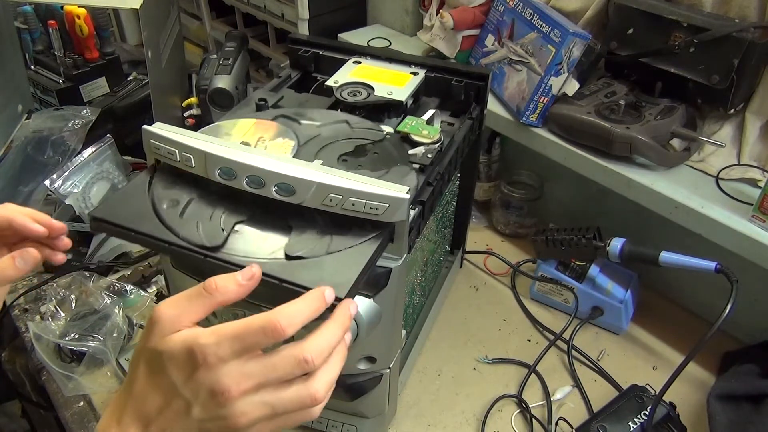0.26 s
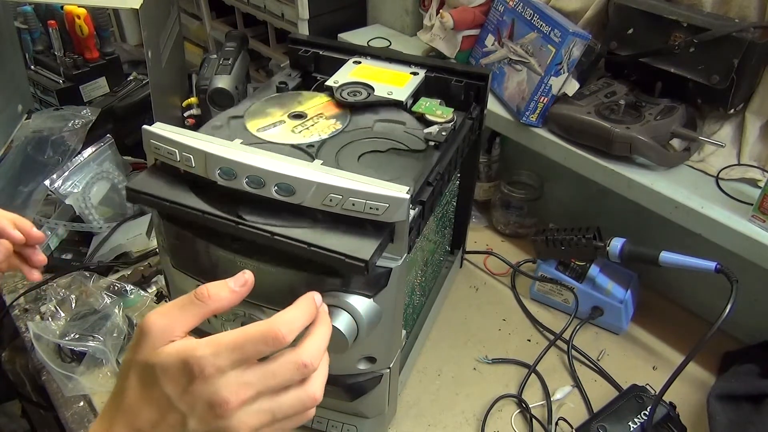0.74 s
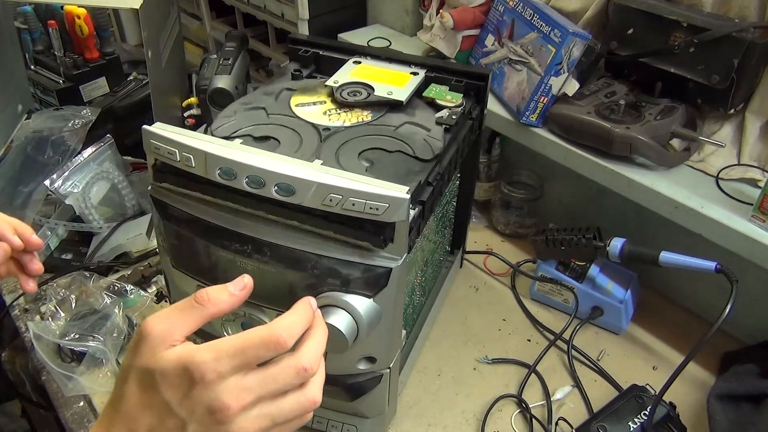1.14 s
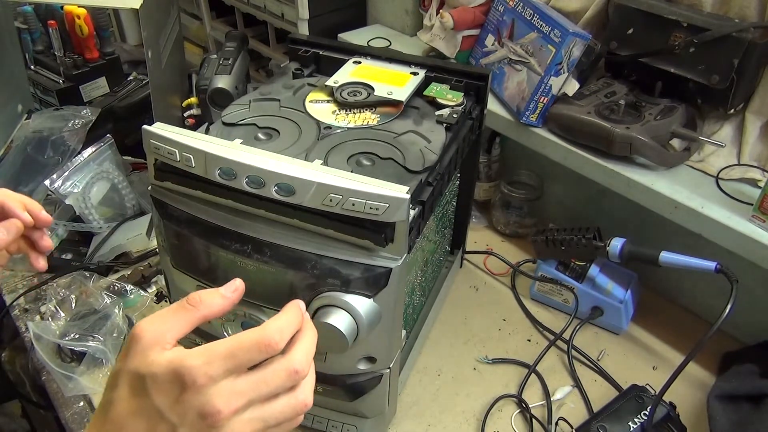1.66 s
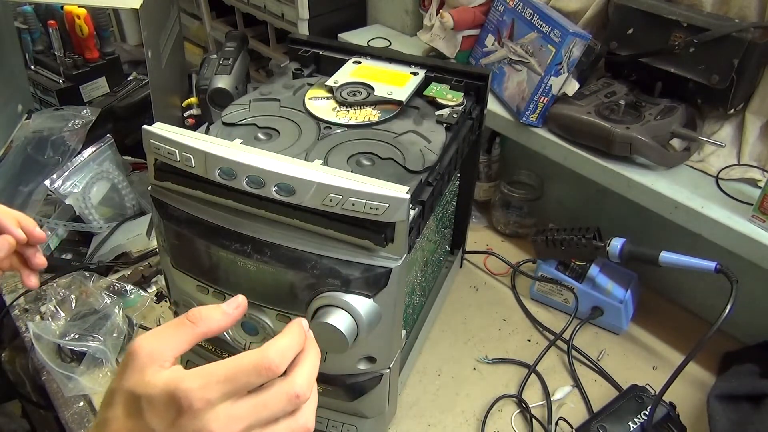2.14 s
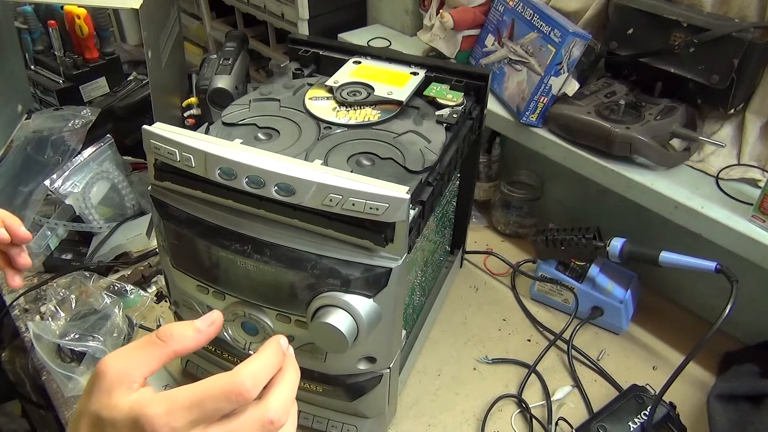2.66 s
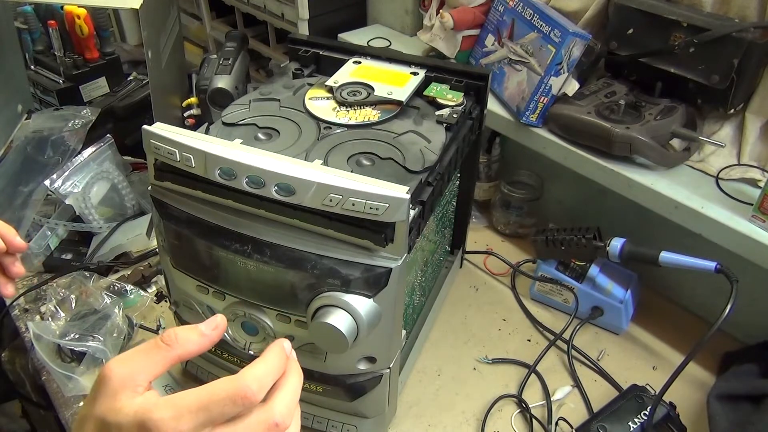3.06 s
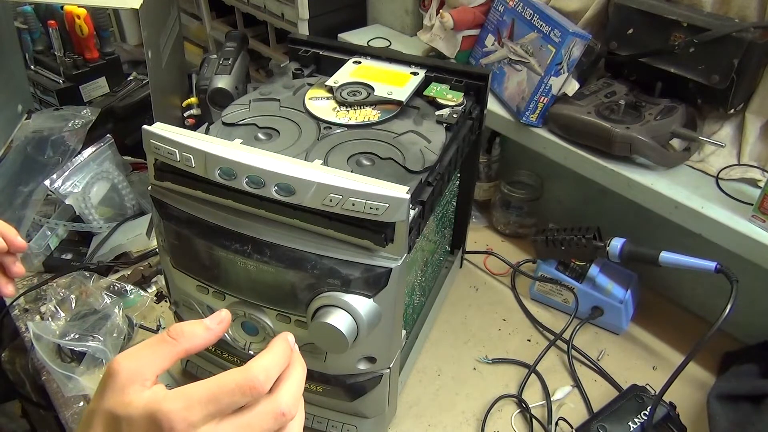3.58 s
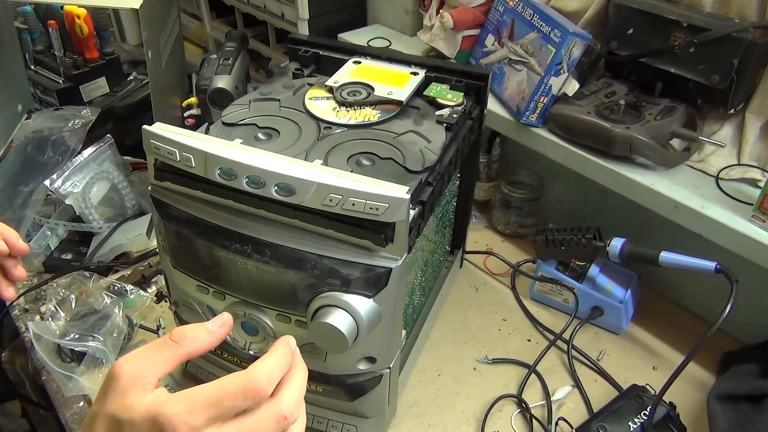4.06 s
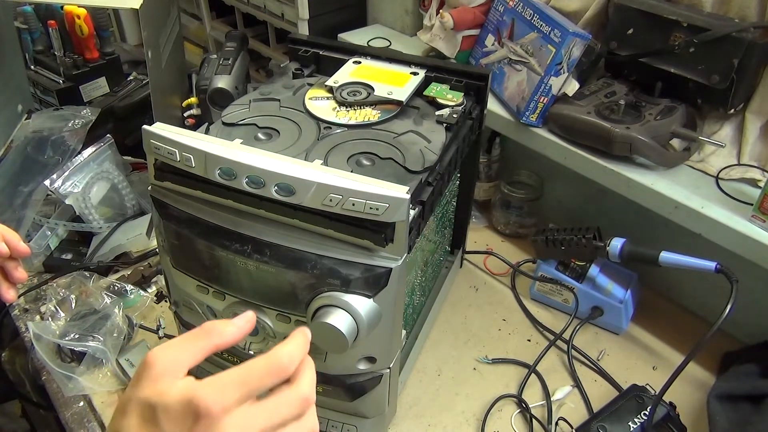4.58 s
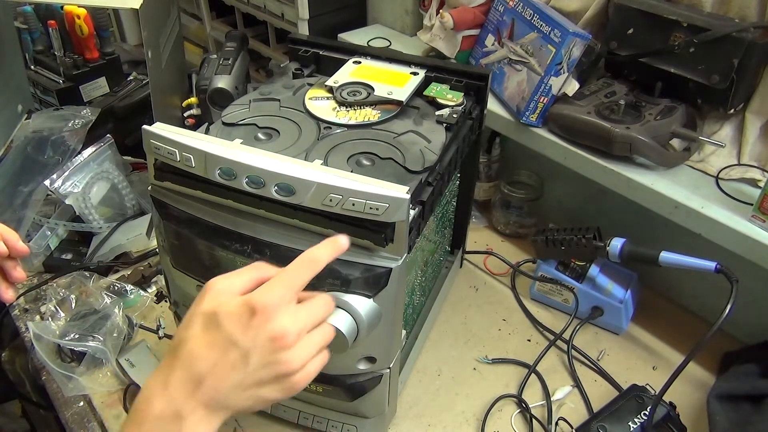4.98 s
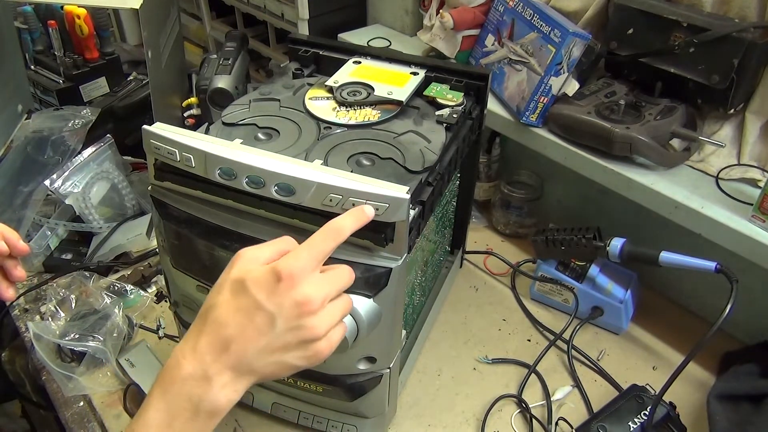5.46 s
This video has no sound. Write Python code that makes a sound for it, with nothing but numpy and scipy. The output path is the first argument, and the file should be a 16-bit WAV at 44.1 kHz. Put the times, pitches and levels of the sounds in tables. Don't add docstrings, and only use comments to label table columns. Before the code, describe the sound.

A plastic disc tray clicks, whirs in on a geared motor, clacks and rattles shut, then a low mains hum swells.

```python
import sys
import numpy as np
from scipy import signal
from scipy.fft import rfft, irfft, next_fast_len
from scipy.io import wavfile
from scipy.ndimage import map_coordinates

SR = 44100
rng = np.random.default_rng(int(sys.argv[2]) if len(sys.argv) > 2 else 0)


def pcm_store(signal):
    levels = np.round(np.clip(np.atleast_2d(signal), -1, 1) * 32767)
    wavfile.write(sys.argv[1], SR, levels.astype(np.int16).T)


def gain_from_db(level_db):
    decades = np.asarray(level_db, float) / 20
    return 10 ** decades


N = 252693
T = np.arange(N) / SR

# time in seconds, level in dB.
PULL_LOAD = [(.1, -63), (.152, -30), (.228, -27), (.296, -34), (.87, -33), (1.148, -30), (1.446, -32),
             (1.57, -30.5), (1.72, -31)]
# time in seconds, level in dB.
LIFT_LOAD = [
    (1.721, -28.5),
    (1.755, -44),
    (2.023, -33.5),
    (2.12, -33.5),
]
# time in seconds, level in dB.
TURN_LOAD = [(2.12, -42.5), (2.275, -39), (2.375, -43), (2.555, -35.5), (2.615, -40.5), (2.655, -36.5),
             (2.737, -42), (2.775, -55), (2.85, -66)]
# case, gears and brushes, all in dB over the load.
LOAD_SHARES = [
    (1.13, 0.6, -9.5),
    (1, -11, -10),
    (1.5, -2, -13),
]
# start in seconds, end in seconds, whine level in dB.
ROTOR_SPINS = [
    (.25, 1.61, -47),
    (2.16, 2.686, -50.5),
]
# time in seconds, level in dB.
CHASSIS_COUPLING = [(.15, -60), (.25, -57), (.9, -62), (1.15, -40.5), (1.6, -32.5), (1.66, -44),
                    (2.14, -39.5), (2.35, -45), (2.74, -41)]
# frequency in Hz, width in Hz, level in dB.
CASE_MODES = [(72, 6.4, 5.5), (238.4, 21, 4), (300, 30, -2.5), (384, 44, 1), (510, 48, 2), (608, 88, -4),
              (738.6, 34, 1.5), (907, 45, -0.5), (1050, 41, 0.5)]
# frequency in Hz, width in Hz, level in dB.
GEAR_MODES = [(1197, 360, -0.5), (1600, 380, 1), (1900, 340, 1), (2460, 300, -1), (2760, 510, -3),
              (3670, 1100, -10.5)]
# frequency in Hz, level in dB per Hz.
BRUSH_SPECTRUM = [(2060, -34.5), (3500, -5.5), (4740, -0.5), (5990, -3.5), (7560, -5.5), (9190, -17),
                  (13200, -20), (15800, -23.5)]
# frequency in Hz, width in Hz, level in dB.
WHINE_MODES = [(7340, 260, 1), (9550, 300, -15), (10300, 330, -16)]


def motor():
    loads = np.array([curves(stage)[0] for stage in (PULL_LOAD, LIFT_LOAD, TURN_LOAD)])
    case, gears, brushes = gain_from_db(np.transpose(LOAD_SHARES)) @ loads
    case = case + gain_from_db(-43.5) * (T < PULL_LOAD[1][0])
    released, engaged = PULL_LOAD[-1][0], LIFT_LOAD[-1][0]
    coasting = held(released, released, db=-38.5, rise=0, fall=50)
    gears = gears + coasting * (T > released) * (T < engaged)
    whine = sum(held(a, b, db, rise=250, fall=220) for a, b, db in ROTOR_SPINS)
    drone = curves(CHASSIS_COUPLING)[0]

    def case_tone(f):
        return resonant(CASE_MODES)(f) * damped(f, 1460)

    def gear_tone(f):
        return resonant(GEAR_MODES)(f) * damped(f, 5500)

    def brush_tone(f):
        return gain_from_db(along(BRUSH_SPECTRUM, f))

    def whine_tone(f):
        return resonant(WHINE_MODES)(f) * (1 - damped(f, 7400))

    def drone_tone(f):
        return resonant([(735, 60, 0)])(f) ** 2

    out = gain_from_db(1.5) * case * spread(case_tone, [(500, 0.94)], 2.2, flutter_db=-1.0)
    out += gain_from_db(1.0) * gears * spread(gear_tone, [(1200, 0.93), (3000, 0.39)], 6.9, flutter_db=1.53)
    out += gain_from_db(3.5) * brushes * spread(brush_tone, [(6000, 0.24)], 5.9, flutter_db=0.4)
    out += whine * sagging(spread(whine_tone, [(7500, 1.0)], 1.4))
    return out + drone * spread(drone_tone, [(735, 0.99)], 2.0)


def sagging(whine):
    free_hz, sag_hz_per_s = 258, 220
    shift_hz = free_hz - sag_hz_per_s * (T - ROTOR_SPINS[0][0])
    shift_hz = shift_hz * (T < LIFT_LOAD[1][0])
    turning = np.exp(2j * np.pi * np.cumsum(shift_hz) / SR)
    return (signal.hilbert(whine, next_fast_len(N))[:, :N] * turning).real


# start in seconds, click level in dB, knock level in dB.
RACK_SKIPS = [
    (0.7541, -12, -14.5),
    (0.7815, -12, -10.5),
    (0.8097, -12, -9),
    (0.8352, -20, -17.5),
]
# start in seconds, peak in dB, ring in Hz, crack in dB, decay (t60) in seconds.
LATCH_CLICKS = [(0.1521, -10.5, 2350, -22, 0.035), (0.163, -18, 1540, -9, .066),
                (0.198, -11.5, 1820, -11, 0.046), (0.2112, -10, 1820, -4, 0.029),
                (0.2455, -28, 2296, -15, .066), (0.7168, -17, 1530, -3, 0.061),
                (1.503, -17.5, 1600, -34, .054), (2.0107, -12, 1790, -10, 0.062),
                (2.0475, -1.5, 2800, -16.5, 0.032), (2.088, -21, 1600, -11, 0.058),
                (2.139, -22, 3030, -11, 0.051), (2.2444, -30, 1600, -2, 0.11),
                (2.2921, -20.5, 2200, -25, 0.038), (2.465, -23, 3000, -13, 0.072),
                (2.488, -36, 1860, -26, .043), (2.5442, -13.5, 1900, -15.5, 0.047),
                (2.5606, -17.5, 1900, -17.5, .035), (2.6465, -20, 2460, -23, 0.052),
                (2.667, -17.5, 2200, -21, 0.029), (2.723, -22, 2070, -19, 0.035),
                (2.7706, -24.5, 2300, -9, 0.049)]
# start in seconds, peak in dB, ring in Hz, crack in dB, snap in dB.
SPRUNG_CATCHES = [
    (0.0844, -23, 2130, -2, -11),
    (1.481, -12, 1630, -7.5, -23),
    (1.9546, -12, 2280, -5, -7.5),
    (2.0718, -9.5, 2520, -9.5, -24),
    (2.425, -34, 1480, -13, -22),
    (2.4495, -22.5, 1820, -15, -21),
]
# frequency in Hz, level in dB.
PLASTIC_SPECTRUM = [(500, -20), (900, -1.5), (1400, -2.5), (2500, -0.5), (4000, -7.5), (5500, -18.5),
                    (8000, -57)]
# frequency in Hz, level in dB.
CRACK_SPECTRUM = [(3200, -20), (4500, 0.5), (6000, 3.5), (8000, -3.5), (9500, -16.5), (11000, -47)]
# frequency in Hz, level in dB.
SNAP_SPECTRUM = [(7500, -30), (9500, 2), (12000, -5), (16000, -11)]


def latches():
    plastic_snap_db = -33.5
    rows = [(*row[:-1], plastic_snap_db, row[-1]) for row in LATCH_CLICKS]
    rows += [(*row, 0.058) for row in SPRUNG_CATCHES]
    rows += [(s, db, 1820, -17.5, plastic_snap_db, 0.036) for s, db, _ in RACK_SKIPS]
    out, t = np.zeros((2, N)), np.arange(SR // 6) / SR
    for s, db, hz, crack_db, snap_db, t60 in sorted(rows):
        def body_tone(f):
            return gain_from_db(along(PLASTIC_SPECTRUM, f)) + resonant([(hz, .15 * hz, 1.5)])(f) * damped(f, 1.7 * hz)

        body = burst(body_tone, t, 0.88) * sides(7.1)
        crack = gain_from_db(crack_db + 3.5) * burst(lambda f: gain_from_db(along(CRACK_SPECTRUM, f)), t, 0.8) * sides(5.2)
        crack += gain_from_db(snap_db + 3.0) * burst(lambda f: gain_from_db(along(SNAP_SPECTRUM, f)), t, .3) * sides(1.6)
        hit = body * gain_from_db(-60 * t / t60) + crack * gain_from_db(-60 * t / (0.58 * t60))
        onset = 1 - np.exp(-t / 0.00045)
        add_at(out, s, room(gain_from_db(db - 1.5) * hit * onset, wet_db=-3.5))
    return out


# start in seconds, peak in dB, ring in Hz, swell in seconds.
TOOTH_RUBS = [(0.1387, -34, 2150, 0.0096), (0.6537, -24, 1740, 0.019), (1.0051, -18, 1960, 0.011),
              (1.0598, -16, 1910, 0.0083), (1.1058, -22, 1320, 0.014), (1.1689, -11, 1900, 0.0079),
              (1.1992, -21, 1970, 0.021), (1.2493, -16, 2000, 0.0062), (1.3254, -14.5, 1800, 0.013),
              (1.6893, -22, 1860, 0.006), (2.674, -18.5, 1600, 0.0088), (2.985, -38, 1300, 0.0072),
              (3.0044, -42.5, 1690, 0.01), (3.0914, -58, 1440, 0.011)]


def rubs():
    out, t = np.zeros((2, N)), np.arange(SR // 6) / SR
    for s, db, hz, swell in TOOTH_RUBS:
        grind = burst(lambda f: resonant([(hz, 500, 0)])(f) ** 2, t, 0.77)
        shape = (t / swell) * np.exp(1 - t / swell)
        add_at(out, s, gain_from_db(db - 10.5) * sides(4.8) * grind * shape)
    return out


# start in seconds, peak in dB, ring in Hz, thud in dB.
TRAY_KNOCKS = [(0.126, -21, 970, -28), (0.153, -17, 535, -17), (0.164, -20, 894, -15),
               (0.174, -17.5, 660, -12), (0.195, -14.5, 420, -27), (0.236, -21, 506, -22),
               (0.341, -24, 893, -20), (0.727, -17, 1010, -9), (0.869, -30, 1050, 0),
               (1.023, -19, 970, -14), (1.178, -21, 935, -5), (1.249, -17, 1000, -14),
               (1.482, -14.5, 732, -15), (1.51, -14, 953, -15), (1.529, -22, 956, -16),
               (1.715, -27, 704, -12)]
# start in seconds, peak in dB, ring in Hz, thud in dB.
CLAMP_KNOCKS = [
    (1.959, -20.5, 670, -19),
    (1.986, -21, 1280, -25),
    (2.004, -18.5, 725, -12),
    (2.052, -21, 1110, -5),
    (2.074, -16, 1300, -7),
    (2.099, -26, 763, -5),
]
# start in seconds, peak in dB, thud in dB.
PLATTER_KNOCKS = [(2.292, -22, -2.5), (2.42, -23, -5), (2.447, -23, -20), (2.463, -8, -16),
                  (2.486, -12.5, -6.5), (2.5458, -3, -18), (2.564, -14.5, -22), (2.584, -17.5, -7),
                  (2.674, -21.5, -6), (2.689, -31, -5)]


def knocks():
    rows = [(*row, 0.058, 3.2) for row in TRAY_KNOCKS]
    rows += [(*row, 0.11, -.3) for row in CLAMP_KNOCKS]
    rows += [(s + .0085, db, 1068, -13.5, 0.045, 5) for s, _, db in RACK_SKIPS]
    rows += [(s, db, 682, thud_db, 0.048, 3.3) for s, db, thud_db in PLATTER_KNOCKS]
    out, t = np.zeros((2, N)), np.arange(SR // 6) / SR
    for s, db, hz, thud_db, t60, pan_db in sorted(rows):
        wall = sides(pan_db) * ring(hz, t60, t)
        thud = gain_from_db(thud_db - 5.0) * ring(rng.uniform(265, 402), 2.2 * t60, t)
        add_at(out, s, room(gain_from_db(db + 0.5) * (wall + thud), wet_db=-14.0))
    return out


def ring(hz, t60, t):
    near = hz * np.exp(0.124 * rng.standard_normal((2, 1)) - .06)
    wave = np.sin(2 * np.pi * hz * t) + gain_from_db(-7.0) * np.sin(2 * np.pi * near * t).sum(0)
    loose = burst(lambda f: resonant([(hz, 1.3 * hz, 0)])(f) * damped(f, 1.35 * hz), t, 0.87)
    return (wave + gain_from_db(-11) * loose) * gain_from_db(-60 * t / t60) * (1 - np.exp(-t / 0.0021))


# frequency in Hz, decay (t60) in seconds.
ROOM_DECAY = [(300, 0.26), (2000, 0.2), (10000, 0.092)]
# frequency in Hz, left-right likeness from 0 to 1.
ECHO_LIKENESS = [(500, 0.94), (1500, 1), (4000, 0.15), (10000, .2)]


def room(hit, wet_db):
    hz, t, z = signal.stft(rng.standard_normal(hit.shape), SR, nperseg=256)
    decay = gain_from_db(-60 * t / along(ROOM_DECAY, hz)[:, None])
    tail = signal.istft(z * decay, SR, nperseg=256)[1][:, :hit.shape[1]]
    tail = paired(tail, np.ones_like, ECHO_LIKENESS)
    tail *= gain_from_db(wet_db) / np.linalg.norm(tail[0])
    tail[:, 0] = 1
    return signal.fftconvolve(hit, tail, axes=1)


# start in seconds, end in seconds, rustle level in dB.
SKIN_TOUCHES = [
    (5.045, 5.09, -53),
    (5.36, 5.7, -53.5),
    (5.735, 5.74, -53),
]
# start in seconds, peak in dB, ring in Hz.
SPRING_TICKS = [
    (5.3534, -36, 6760),
    (5.475, -38, 6770),
    (5.5019, -39, 6800),
    (5.5485, -36, 6730),
    (5.7187, -34, 6310),
]
# frequency in Hz, level in dB.
SKIN_SPECTRUM = [(1200, -8), (2500, -1), (5000, -7), (10000, -17), (16000, -20)]


def button():
    rustle = sum(held(a, b, db, rise=200, fall=58) for a, b, db in SKIN_TOUCHES)
    press = held(5.35, N / SR, db=-60.5, rise=500, fall=0)
    preload = gain_from_db(-76) * (T > SKIN_TOUCHES[0][0])
    kicks = sum(held(s, s, db - 28, rise=500, fall=300) for s, db, _ in SPRING_TICKS)

    def spring_tone(f):
        return resonant([(6900, 550, 0)])(f) ** 2

    def skin_tone(f):
        return gain_from_db(along(SKIN_SPECTRUM, f))

    spring = press + preload + kicks
    out = gain_from_db(-0.5) * spring * spread(spring_tone, [(7000, 0.41)], 2.1, flutter_db=-1.0)
    out += gain_from_db(-1.0) * rustle * spread(skin_tone, [(3000, 0.29)], 2.6, flutter_db=2.0)
    t = np.arange(SR // 40) / SR
    for s, db, hz in SPRING_TICKS:
        tick = burst(lambda f: resonant([(hz, 1300, 0)])(f) ** 2, t, .6)
        add_at(out, s, gain_from_db(db - 2.5 - 60 * t / .022) * tick)
    return out


def pinion():
    hiss = spread(lambda f: resonant([(3450, 70, 0)])(f) ** 2, [(3500, .6)], 7, flutter_db=4.0)
    return held(.25, .68, db=-47, rise=150, fall=150) * hiss


# frequency in Hz, width in Hz, level in dB.
COIL_MODES = [(5000, 600, 0), (6900, 500, -2)]


def focus_coil():
    hiss = spread(lambda f: resonant(COIL_MODES)(f) ** 2, [(5000, .5)], 4.5, flutter_db=1.5)
    return held(3.06, 3.6, db=-68, rise=150, fall=150) * hiss


# harmonic order, level in dB.
MAINS_OVERTONES = [(7, -38), (9, -29.5), (11, -30.5), (13, -41.5), (15, -38), (17, -37.5), (19, -41)]
# harmonic order, level in dB.
CORE_BUZZ = [(2, -35.5), (4, -39), (8, -40.5), (10, -49), (14, -59)]


def hum():
    mains_hz = 50.012
    turn = 2 * np.pi * mains_hz * T + 3.01

    def spike(order):
        return np.cos(order * (turn - .985) + 3.94)

    line = np.cos(turn) - gain_from_db(-7.2) * np.sin(3 * turn) + gain_from_db(-15.2) * np.sin(5 * turn)
    line += sum(gain_from_db(db) * spike(round(k)) for k, db in MAINS_OVERTONES)
    line += sum(gain_from_db(-42.0 - .5 * (k - 20.0)) * spike(k) for k in range(21, 64, 2))
    buzz = sum(gain_from_db(db) * np.cos(round(k) * turn) for k, db in CORE_BUZZ)
    return np.sqrt(2) * (line * sides(-8) + buzz * sides(1.5))


# frequency in Hz, level in dB per Hz.
HISS_SPECTRUM = [(22, -6), (72, 1), (98, -18.5), (125, -5.5), (300, -10.5), (700, -20.5), (3000, -30.5),
                 (13000, -40)]
# frequency in Hz, left-right likeness from 0 to 1.
HISS_LIKENESS = [(100, 0.96), (500, 0.45), (2000, 0.23), (8000, .1)]
# time in seconds, level in dB.
AUTO_GAIN = [(0, -16.5), (.2, -17.5), (.212, -25), (.8, -21.5), (1.5, -18.5), (2.045, -18), (2.052, -26.5),
             (2.14, -23), (2.9, -22), (3.6, -20), (4.6, -18), (5.73, -16)]


def background():
    hiss = spread(lambda f: gain_from_db(along(HISS_SPECTRUM, f)), HISS_LIKENESS, 0.41)
    drift = gain_from_db(.4 * wobble(3))
    return curves(AUTO_GAIN)[0] * (hum() + gain_from_db(-22) * drift * hiss)


def unit(x):
    return x / np.sqrt(np.mean(x ** 2) + 1e-20)


def along(points, hz):
    f, v = np.transpose(points)
    return np.interp(np.log(hz + 1), np.log(f + 1), v)


def curves(rows):
    s, *cols = np.transpose(rows)
    return [gain_from_db(np.interp(T, s, c, -120, -120)) for c in cols]


def held(start, stop, db, rise, fall):
    return gain_from_db(db - rise * np.maximum(start - T, 0) - fall * np.maximum(T - stop, 0))


def wobble(rate):
    return map_coordinates(rng.standard_normal(int(N * rate / SR) + 4), [T * rate])


def filtered(x, response):
    n = x.shape[-1]
    m = next_fast_len(n + min(n // 4, 8192))
    return irfft(rfft(x, m) * response(np.fft.rfftfreq(m, 1 / SR)), m)[..., :n]


def resonant(modes):
    def response(f):
        total = 0
        for k, (hz, width, db) in enumerate(modes):
            total = total + (-1) ** k * gain_from_db(db) * 1j * f * width / (hz * hz - f * f + 1j * f * width)
        return total
    return response


def damped(f, top_hz):
    return 1 / (1 + (f / top_hz) ** 4)


def sides(pan_db):
    pair = gain_from_db(np.array([[pan_db / 2], [-pan_db / 2]]))
    return pair / pair.mean()


def paired(two, response, alike):
    def mid_side(hz):
        angle = np.arccos(np.clip(along(alike, hz), -1, 1)) / 2
        return response(hz) * np.array([np.cos(angle), np.sin(angle)])

    mid, side = filtered(two, mid_side)
    return np.array([mid + side, mid - side])


def spread(response, alike, pan_db, flutter_db=0):
    noise = rng.standard_normal((2, N)) * gain_from_db(flutter_db * wobble(90))
    return unit(paired(noise, response, alike)) * sides(pan_db)


def burst(response, t, alike):
    return unit(paired(rng.standard_normal((2, len(t))), response, [(1000, alike)]))


def add_at(out, s, hit):
    start = round(s * SR)
    hit = hit[:, :N - start]
    out[:, start:start + hit.shape[1]] += hit


def scene():
    machine = motor() + latches() + rubs() + knocks()
    return machine + button() + pinion() + focus_coil() + background()


# time in seconds, gain in dB.
LIMITER_DUCK = [
    (0, 0),
    (2.027, 0),
    (2.034, -7),
    (2.046, -7),
    (2.049, 0),
    (5.74, 0),
]


def microphone_line(dry):
    lag_s = np.array([[1 / SR], [0]])
    limited = dry * curves(LIMITER_DUCK)[0]
    late = filtered(limited, lambda f: np.exp(-2j * np.pi * f * lag_s) * (f < 16200))
    return late / (1 + np.abs(late) ** 8) ** (1 / 8)


def top_cut(x):
    return signal.sosfilt(signal.butter(12, 15970, fs=SR, output="sos"), x)


def record(dry):
    return top_cut(microphone_line(dry))


dry = scene()
out = record(dry)
pcm_store(out)
```